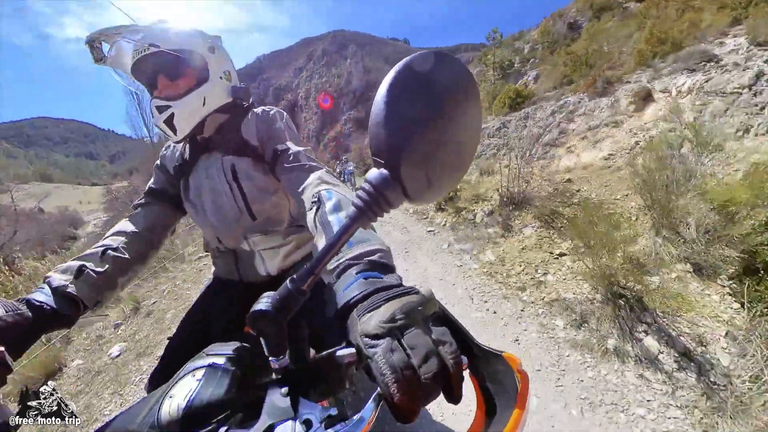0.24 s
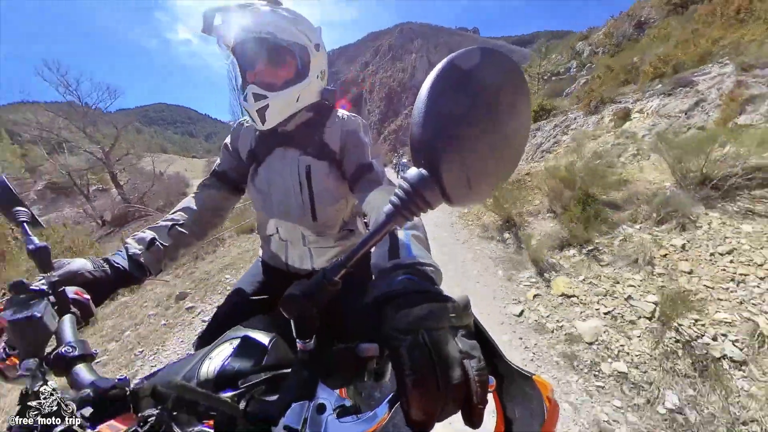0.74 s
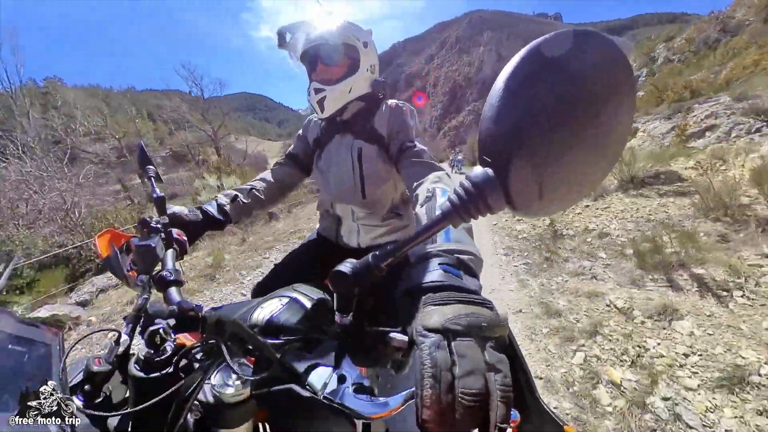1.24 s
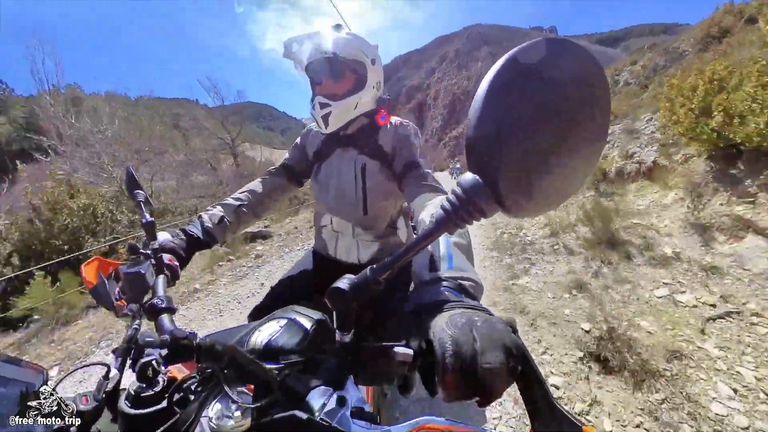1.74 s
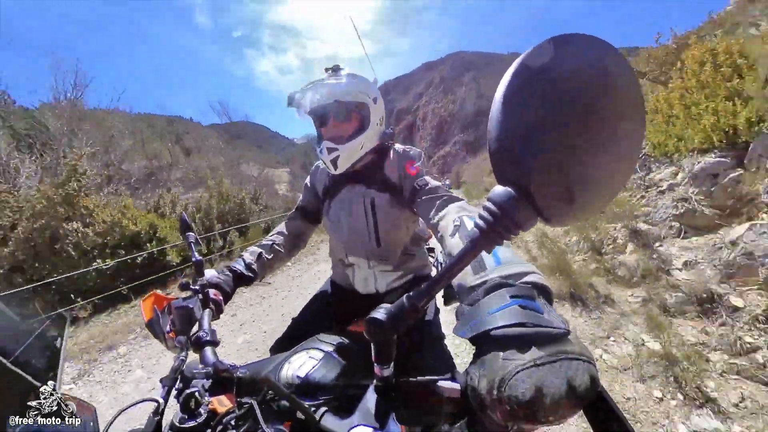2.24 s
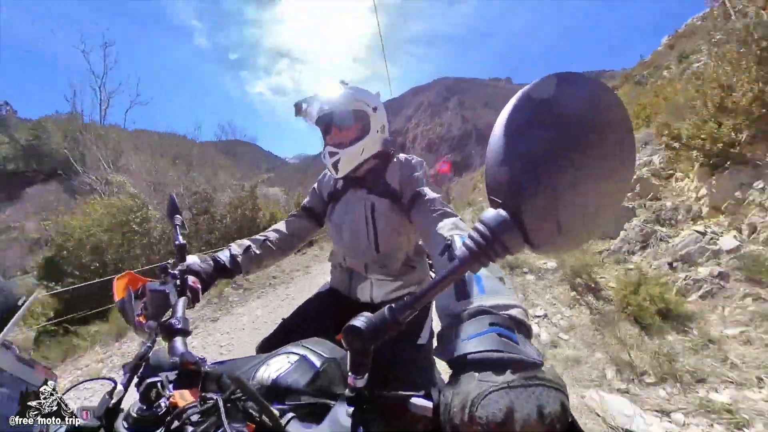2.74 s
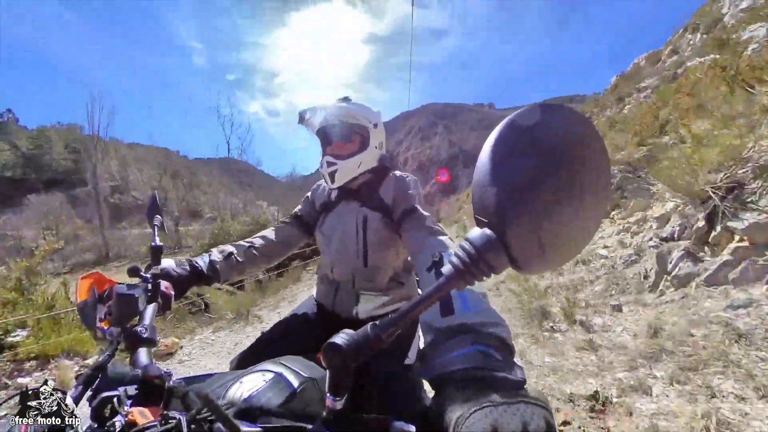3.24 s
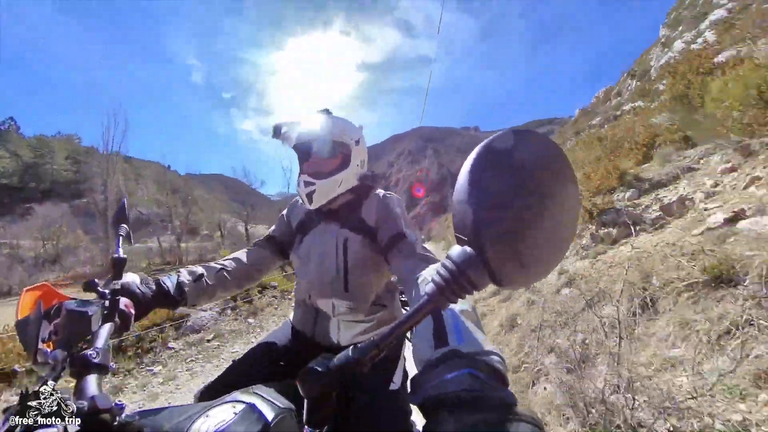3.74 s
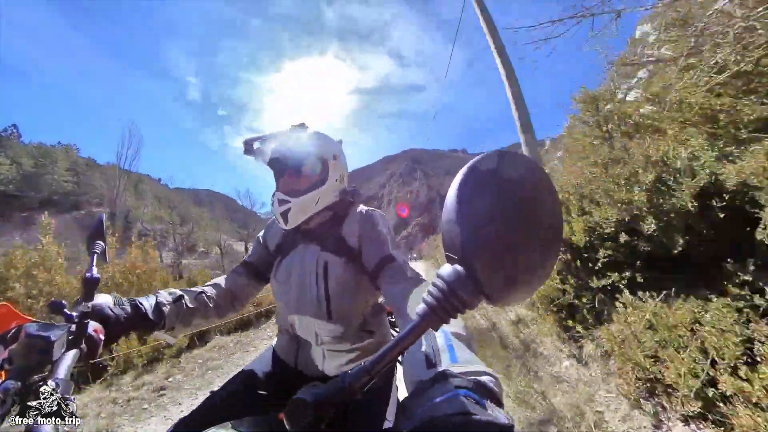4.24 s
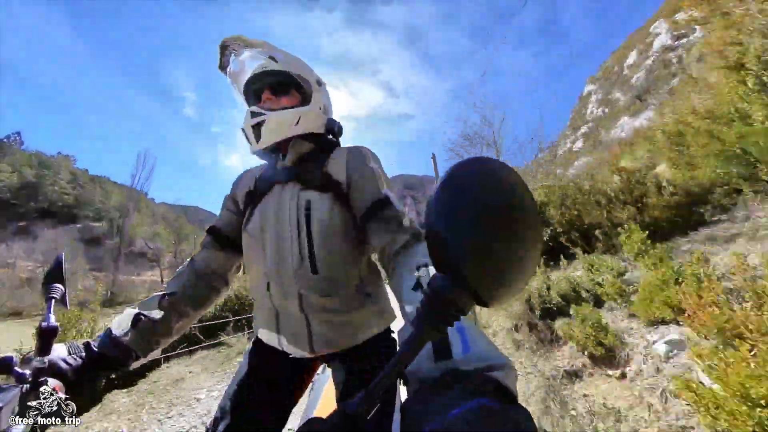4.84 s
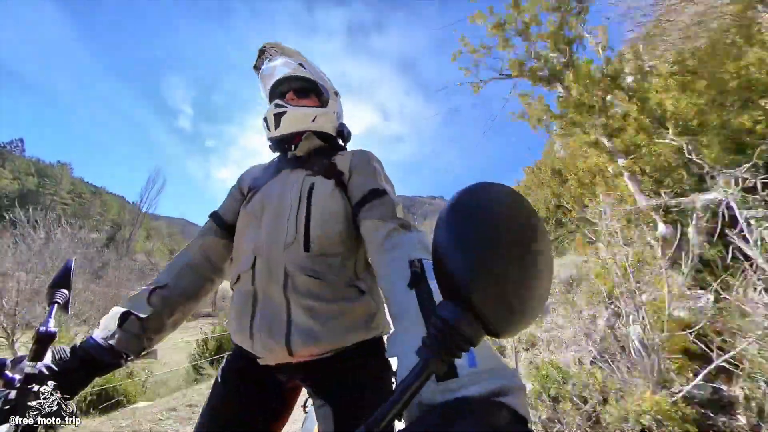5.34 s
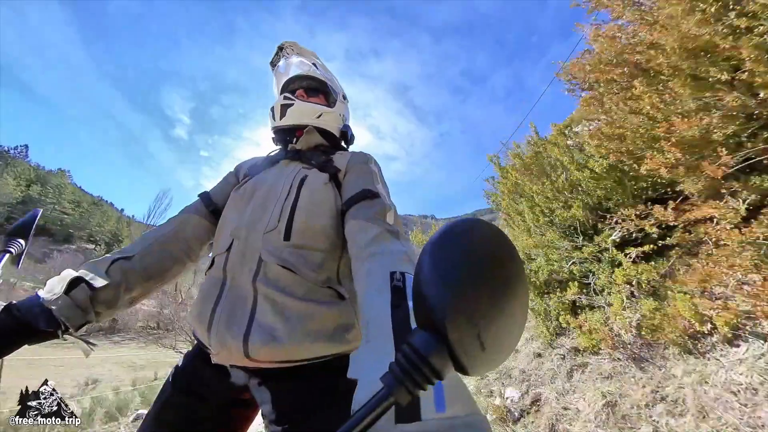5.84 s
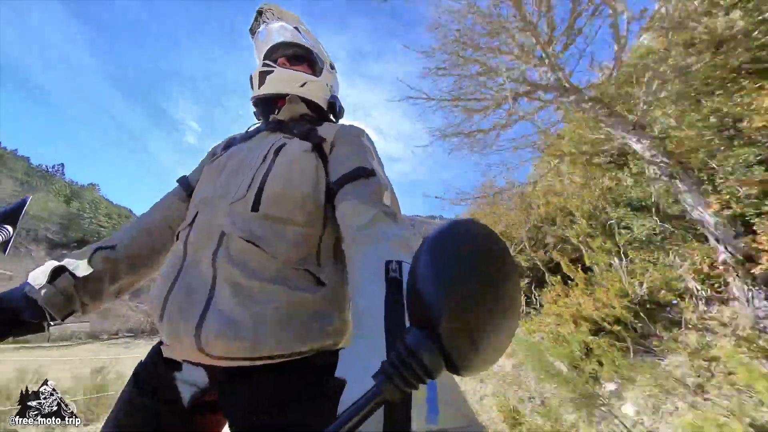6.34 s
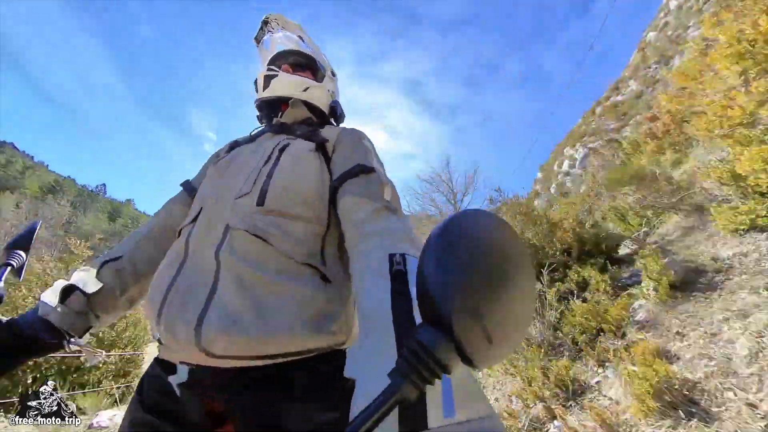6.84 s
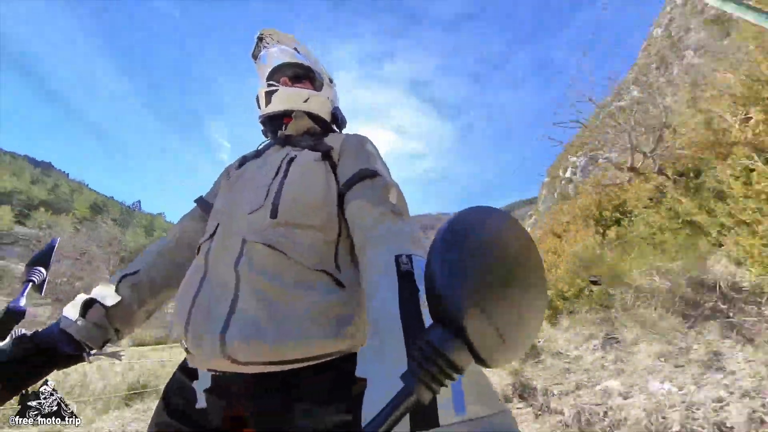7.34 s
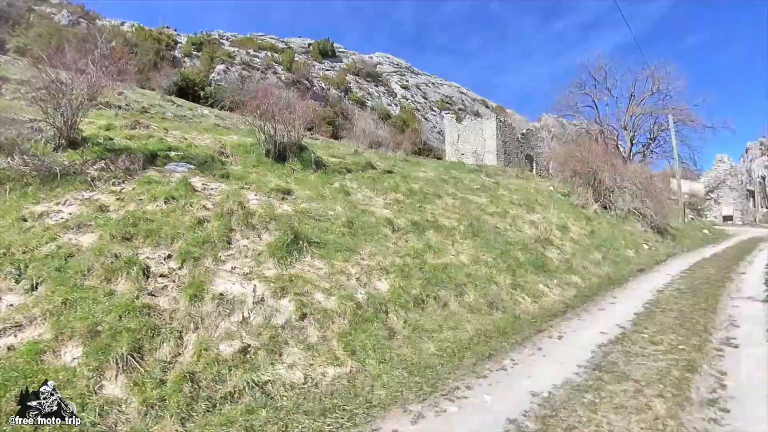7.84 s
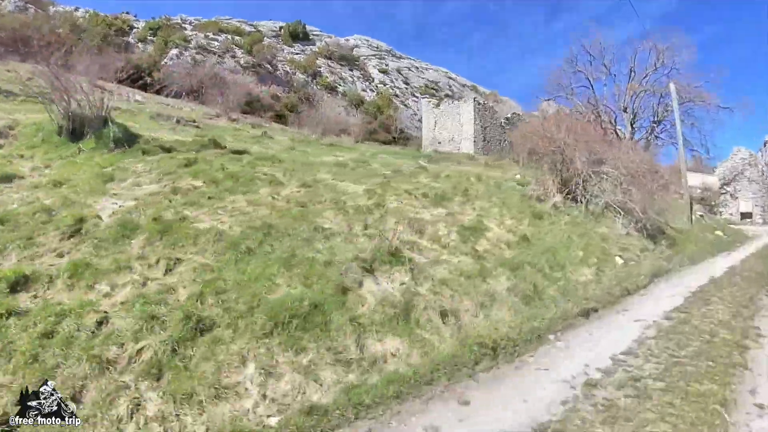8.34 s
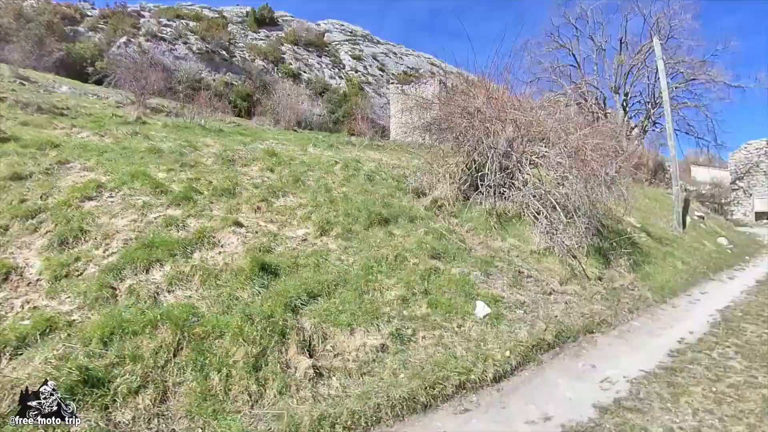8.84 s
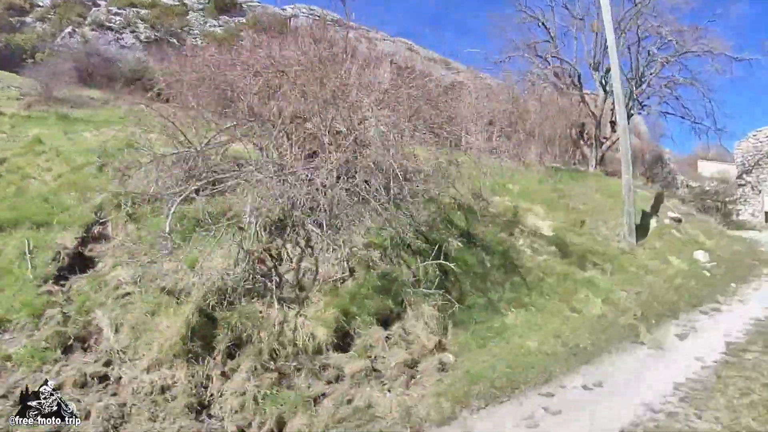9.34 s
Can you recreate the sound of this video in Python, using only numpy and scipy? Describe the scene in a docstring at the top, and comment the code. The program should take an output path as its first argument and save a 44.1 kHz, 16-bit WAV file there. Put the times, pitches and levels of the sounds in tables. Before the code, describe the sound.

A motorcycle engine throbs and drones along a gravel trail, with stones knocking against the frame and light wind scuffing the microphone.

```python
"""A dull, throbbing roar with firing tones in it: a twin-cylinder motorcycle pulls along a gravel trail.
Periodic firing gives the tones and modulates the roar and the buzzing panels; a thin hiss lies on top.
Stones strike the frame and excite its modes, and turbulent wind scuffs the right port of a two-port
microphone on the handlebar. A limiter holds the peaks; near the end the gain jumps up with a tick."""
import sys
import numpy as np
from scipy import signal
from scipy.fft import rfft, irfft
from scipy.io import wavfile
from scipy.ndimage import uniform_filter1d, minimum_filter1d

SR = 44100
rng = np.random.default_rng(int(sys.argv[2]) if len(sys.argv) > 2 else 0)


def persist_wave(psi):
    """Save psi, clipped to +-1, as 16-bit WAV."""
    counts = np.round(np.clip(psi, -1, 1) * 32767).astype(np.int16)
    wavfile.write(sys.argv[1], SR, np.atleast_2d(counts).T)


N = 422478
T, HZ = np.arange(N) / SR, np.fft.rfftfreq(N, 1 / SR)
JUMP_S = 7.863  # the gain steps up here


def amp(db):
    """Amplitude ratio of a level in dB."""
    return 10 ** (np.asarray(db) / 20)


def unit_rms(x):
    """Normalisation to rms 1."""
    return x / np.sqrt(np.mean(x ** 2) + 1e-20)


def over_hz(rows):
    """Interpolation of a table's columns over log frequency."""
    f, *columns = np.transpose(rows)
    return [np.interp(np.log(HZ + 1), np.log(f), c) for c in columns]


def over_time(rows):
    """Interpolation of a table's columns over time."""
    s, *columns = np.transpose(rows)
    return [np.interp(T, s, c) for c in columns]


def drift(rate_hz):
    """Random fluctuation of rms 1: noise low-passed near rate_hz."""
    hz = np.fft.rfftfreq(8192, N / SR / 8192)
    slow = irfft(rfft(rng.standard_normal(8192)) * np.exp(-(hz / rate_hz) ** 2))
    return unit_rms(np.interp(T, np.linspace(0, N / SR, 8192), slow))


def lorentzian(f, hz, width):
    """Resonance curve of height 1, centred on hz."""
    return 1 / (1 + (2 * (f - hz) / width) ** 2)


def resonance(envelope, hz, width):
    """Forced response, at rms 1, of a resonator to modulated noise; hz may glide."""
    force = rng.standard_normal(N) * envelope
    carrier = np.exp(2j * np.pi * np.cumsum(hz * np.ones(N)) / SR)
    pole = np.exp(-np.pi * width / SR)
    baseband = signal.lfilter([1], np.convolve([1, -pole], [1, -pole]), force / carrier)
    return unit_rms((carrier * baseband).real)


def exhaust_throb(turns, second_puff, depth):
    """Amplitude modulation by two decaying puffs a cycle, no two firings alike."""
    puffs = np.exp(-(turns % 1) / 0.15) + second_puff * np.exp(-((turns - 0.47) % 1) / 0.2)
    firing_index = (2 * turns + 0.06).astype(int)
    uneven_db = 2.5 * np.clip(rng.standard_normal(600), -2, 1.5)[firing_index]
    return (1.2 - 0.75 * depth + 1.5 * depth * puffs * amp(uneven_db)) * amp(1.5 * drift(16.3))


def firing_tones(turns, cycle_hz, odd_db):
    """Harmonic series of the engine cycle; pipe resonances lift the orders that cross them."""
    # orders 3 to 14, some favoured by uneven firing: level/dB
    low_orders_db = [-34, -27, -27, -27, -23, -27, -34, -24, -33, -28, -28, -39]
    # exhaust pipe resonances: f/Hz, width/Hz, lift/dB
    pipe_modes = [(248, 40, 5), (128, 22, 7)]
    high_orders_db = [-34.5 if k % 2 else -33.5 for k in range(15, 31)]
    out = 0
    for k, db in enumerate(low_orders_db + high_orders_db, 3):
        pipe_db = sum(lift * lorentzian(k * cycle_hz, hz, width) for hz, width, lift in pipe_modes)
        level_db = db + pipe_db + odd_db * (k % 2) + 2 * drift(5.7)
        out = out + amp(level_db) * np.cos(2 * np.pi * (k * turns + rng.random()))
    return out


def roar(throb, bass_db, low_boom_db, high_boom_db):
    """Band-split noise, two independent signals: bass, then boom and clatter modulated by the firing."""
    bass_band, clatter_band = 1 / (1 + (HZ / 165) ** 6), 1 / (1 + (520 / (HZ + 1)) ** 8)
    boom_band = (1 - bass_band) * (1 - clatter_band)
    split, dull = 1 / (1 + (HZ / 275) ** 10), 1 / (1 + (HZ / 1800) ** 4)
    chug = unit_rms(uniform_filter1d(throb, size=500) * amp(1.5 * drift(14)))  # one lump to a firing
    pair = []
    for a, b, c in rng.standard_normal((2, 3, N)):
        bass = rfft(a * amp(bass_db)) * np.sqrt(bass_band)
        boom = rfft(b * chug * amp(low_boom_db)) * split + rfft(b * chug * amp(high_boom_db)) * (1 - split)
        clatter = rfft(c * throb) * dull + rfft(c * np.sqrt(throb)) * (1 - dull)  # treble throbs less
        pair.append(irfft(bass + boom * np.sqrt(boom_band) + clatter * amp(-2.5) * np.sqrt(clatter_band), N))
    return pair


def ports(common, left_only, tones):
    """Partial coherence: the left port mixes the right's roar, phase-shifted, with its own."""
    # response of the ports: f/Hz, left/dB, right/dB, coherence, left lag/rad
    response = [(30, -35, -27.5, 0.4, 8), (57, -24.5, -27, 0, -1.5), (94.4, -17.5, -6.5, 0.8, 4.5),
                (130, -7.5, -16, 0.6, 0), (142, -7.5, -15.5, 0.1, -0.4), (165, -8.5, -10, 0.5, 4),
                (210, -8.5, -8.5, 0.3, 2.5), (252.3, -2, -3.5, 0.96, 2.5), (326.6, 0, -0.5, 0.96, 2.5),
                (368.3, -10.5, -7.5, 0.54, 2.5), (448.3, -4, -10, 0.74, 2.5), (612, -23, -15.5, 0.15, 6),
                (737, -22.5, -10.5, 0.4, -10.5), (970, -23.5, -20.5, 1, -5), (1552, -32, -24.5, 0.4, -4),
                (2520, -47, -45.5, 0.8, -1), (4240, -52.5, -50.5, 0, -4.5), (6200, -82, -82, 0.15, -28.5)]
    # housing resonances: f/Hz, width/Hz, left lift/dB, right lift/dB
    housing_modes = [(117.6, 22, 1.5, 0), (1505, 180, -3.5, -11), (1910, 140, 6.5, 5.5), (736, 150, -7, -1)]
    # path of the firing tones to the left port: f/Hz, lag/rad, level/dB
    tone_path = [(90, 1.1, 0), (115, 0, -4), (143, 0.2, -4), (155, 2.6, -1), (200, 2.4, 1), (240, 1.9, 0),
                 (265, 1.8, 0), (295, 2.4, -1), (700, 2.5, -1)]
    left_db, right_db, coherence, lag = over_hz(response)
    for hz, width, left_lift_db, right_lift_db in housing_modes:
        left_db += left_lift_db * lorentzian(HZ, hz, width)
        right_db += right_lift_db * lorentzian(HZ, hz, width)
    coherence = np.clip(coherence, 0, 1)
    tone_lag, tone_db = over_hz(tone_path)
    left = coherence * np.exp(-1j * lag) * rfft(common) + np.sqrt(1 - coherence ** 2) * rfft(left_only)
    left += amp(tone_db) * np.exp(-1j * tone_lag) * rfft(tones)
    return irfft([left * amp(left_db), rfft(common + tones) * amp(right_db)], N)


def panel_buzz(throb, load_db):
    """Forced vibration of pipe and panels; their balance shifts with load and at the jump."""
    # modes: f/Hz, width/Hz, left/dB, right/dB, slope/(dB per dB of load), change at jump/dB, left sign
    panel_modes = [(626, 160, -25, -31.5, 5.5, -7.5, -1), (164, 43, -18, -24, -2, 11, 1),
                   (233.5, 64, -15, -12.5, -1, 11, 1), (777, 230, -31, -15.5, 0, 5.5, -1),
                   (970, 740, -27.5, -23, 1, -7, 1), (1080, 276, -27, -12, 3, 17, 1),
                   (1530, 220, -17.5, -30.5, 0.5, 2, -1), (1994, 140, -26.5, -13, 5, 10.5, -1)]
    jumped = np.clip((T - JUMP_S) / 0.0033, 0, 1)
    out = 0
    for hz, width, left_db, right_db, slope, change_db, sign in panel_modes:
        buzz = resonance(throb, hz, width) * amp(slope * load_db + change_db * jumped)
        out += buzz * amp([[left_db], [right_db]]) * [[sign], [1]]
    return out


def hum_and_drone(throb):
    """Narrow-band noise: resonances near 130 and 245 Hz swell and fade."""
    # the two resonances: f/Hz, width/Hz, left/dB, right/dB
    modes = [(132.6, 29, -17.5, -10.5), (246.2, 40, -13, -12)]
    # their swells: t/s, hum level/dB, drone level/dB
    swells = [(0, 3, -4), (.5, 11, -9), (1.25, 8, -6), (1.45, -2, -8), (2.0, -3, -3), (2.8, 0.5, -2),
              (3.4, -1, 5), (3.6, 2.5, -8), (4.1, 0.5, 1), (4.8, -3, -8.5), (5.5, 5.5, 3), (6.3, 4, 3.5),
              (7.0, -4.5, 0), (7.8, -0.5, -3), (8.0, -3, 0.5), (8.5, 1, -5), (9.1, -6.5, -0.5),
              (9.58, -2.5, -6.5)]
    return sum(resonance(throb, hz, width) * amp(swell_db) * amp([[left_db], [right_db]])
               for (hz, width, left_db, right_db), swell_db in zip(modes, over_time(swells)))


def growl(throb, level_db):
    """Forced vibration of tank and fairing, in antiphase at the two ports."""
    # tank and fairing modes: f/Hz, width/Hz, left/dB, right/dB
    modes = [(612.6, 48, -15, 6.5), (407, 56, -0.5, -2.5)]
    return sum(resonance(throb, hz, width) * amp(level_db) * amp([[left_db], [right_db]])
               for hz, width, left_db, right_db in modes) * [[-1], [1]]


def gear_whine(throb, cycle_hz, tones_db):
    """Tooth meshing: a noise band at a fixed multiple of the engine's cycle rate."""
    teeth_per_cycle = 158
    whine = resonance(np.sqrt(throb), teeth_per_cycle * cycle_hz, width=260)
    return whine * amp(-29 + 0.6 * tones_db + 1.5 * drift(6)) * [[-0.6], [1]]


def engine():
    """Periodic excitation: one firing cycle times the tones, the roar and the resonances."""
    # engine speed, which a gear change drops: t/s, cycle rate/Hz
    speed = [(0, 18.4), (.4, 18.3), (.8, 17.75), (1.2, 18.8), (1.5, 20.5), (1.9, 20.5), (2.1, 21.15),
             (2.5, 21.75), (2.7, 22.6), (2.85, 23.0), (3.0, 24.05), (3.2, 23.95), (3.45, 25.0), (3.6, 24.5),
             (3.9, 17.8), (4.05, 17.8), (5.4, 21.55), (5.9, 22.4), (6.4, 22.5), (7.0, 21.45), (7.4, 21.2),
             (8.2, 21.4), (9.58, 20.4)]
    # load and timbre: t/s, load/dB, bass/dB, boom near 240 Hz/dB, boom near 310 Hz/dB, growl/dB
    load = [(0, -0.5, 1, 0.5, 1.5, -11), (.5, -3.5, 1, -5.5, 0, -16), (1.2, -0.5, -3, -5, -1, -10),
            (1.45, -4.5, -3.5, -5.5, 1.5, -19.5), (1.9, -3, -5.5, -1, -2.5, -6),
            (2.5, -2.5, -3, -1, -2.5, -14.5), (3.0, -0.5, 2.5, -5, -4, -15), (3.45, -2, 2, 4.5, -5.5, -24),
            (3.6, -7, -3, 1.5, -1, -18), (4.1, -6.5, 4.5, -0.5, -1, -18.5),
            (4.5, -1.5, -3.5, 7.5, -3, -15.5), (5.0, -8, -2, -3.5, -0.5, -14),
            (5.9, -2, 2.5, 4.5, -0.5, -10.5), (6.3, -4, 4.5, 4, -0.5, -35),
            (7.0, -3, 2.5, 7.5, -1.5, -26.5), (7.85, -3.5, -1.5, 2, 0, -25),
            (8.5, -3.5, -2.5, 2.5, -3, -25), (9.2, -3, 4, 3.5, -2, -33), (9.58, -2, -13, -7.5, 8, -27)]
    # firing: t/s, tone level/dB, odd-order change/dB, second puff re first, depth of throb
    firing = [(0, -5, 0, .5, .9), (.8, -5, 0, .4, 1), (1.5, -3, -1, .4, 1), (1.9, -3, -2, .3, 1),
              (2.1, 1, -3, .3, 1), (2.5, 1, -2, .9, 1), (3.0, 2, 0, .9, 1), (3.4, 1, 0, .9, .9),
              (3.53, -9, 0, .6, .5), (4.0, -7, -2, .5, .6), (5.0, -5, -2, .7, .6), (5.5, -3, -1, .95, .9),
              (6.1, -3, -2, .95, .9), (6.5, -6, -3, .6, .7), (7.2, -5, -3, .5, .9), (7.8, -4, -4, .7, .7),
              (7.9, -1, -9, .9, .5), (9.0, -1, -9, .9, .5), (9.58, -4, -9, .9, .5)]
    cycle_hz, = over_time(speed)
    load_db, bass_db, low_boom_db, high_boom_db, growl_db = over_time(load)
    tones_db, odd_db, second_puff, depth = over_time(firing)
    turns = np.cumsum(cycle_hz * (1 + 0.0027 * drift(4.2))) / SR  # phase in engine cycles
    throb = exhaust_throb(turns, second_puff, depth)
    tones = amp(tones_db) * firing_tones(turns, cycle_hz, odd_db)
    common, left_only = roar(throb, bass_db, low_boom_db, high_boom_db)
    out = unit_rms(ports(common, left_only, tones)) * amp(9)
    out += panel_buzz(throb, load_db) + hum_and_drone(throb) + growl(throb, growl_db)
    return (out + gear_whine(throb, cycle_hz, tones_db)) * amp(-25)


def hiss():
    """Partly coherent treble noise; its low and high bands flicker independently."""
    # hiss spectrum: f/Hz, level/dB
    spectrum = [(4500, -23.5), (5500, -16.5), (7000, -16), (10200, -19), (11500, -6), (13200, 0),
                (14500, -7), (15700, -4.5)]
    # likeness of left and right: f/Hz, coherence
    likeness = [(5000, 0.34), (6500, 1), (10800, 1), (12900, .25), (15000, .55)]
    # hiss envelope: t/s, level/dB
    envelope = [(0, -58), (2.9, -56.5), (3.5, -59.5), (5.0, -58.5), (5.4, -56.5), (6.2, -57), (7.8, -58.5),
                (7.9, -60), (8.14, -54), (8.4, -58.5), (9.58, -58.5)]
    coherence = np.clip(over_hz(likeness)[0], 0, 1)
    noise = rng.standard_normal((2, N))
    low, high = (rfft(noise * amp(2.3 * drift(20) + drift(90))) for _ in range(2))
    right, left_only = np.where(HZ > 10300, high, low)
    left = coherence * right + np.sqrt(1 - coherence ** 2) * left_only
    pair = irfft(np.array([left, right]) * amp(over_hz(spectrum)[0]), N)
    return unit_rms(pair) * amp(over_time(envelope)[0] + [[1], [-1]])  # leans left


def stones():
    """Impact excitation: each stone rings the frame's damped modes, most those near its own pitch."""
    # stone strikes: t/s, peak level at the right port before limiting/dB, f/Hz
    strikes = [(0.053, -0.5, 624), (0.111, -8, 600), (0.408, -2.5, 630), (0.582, -9, 630), (0.632, -1, 710),
               (0.802, -18, 700), (0.967, -1, 633), (1.13, -4.5, 616), (1.183, -10, 600), (1.334, -4, 649),
               (1.726, -5, 1220), (1.861, -3, 923), (2.067, -3, 620), (2.35, -5.5, 614), (2.486, -6, 600),
               (2.623, -6, 600), (2.886, -5, 560), (3.841, -5, 1080), (4.091, -5, 800), (4.125, -3, 624),
               (4.363, -2.5, 1200), (4.389, -1, 910), (4.444, 1, 706), (4.908, -5, 635), (5.057, -8, 750),
               (5.101, -3, 600), (5.429, -7, 681), (5.841, 0, 890), (5.931, -7, 620), (7.056, -4, 700),
               (7.102, 0, 905), (7.17, -10, 950), (7.195, -4.5, 910), (7.242, -3, 614), (7.336, -7, 1200),
               (7.344, -0.5, 1000), (7.477, -4, 600), (7.568, -3, 675), (7.893, -2, 773), (8.149, 1, 1140),
               (8.409, -15, 1090), (8.47, -1, 1060), (8.647, -9, 845), (8.934, -3, 1090), (9.07, -2, 1050),
               (9.241, -2, 1060), (9.272, -7, 673), (9.394, -9, 1060), (9.417, -11, 600)]
    # frame modes: f/Hz, level/dB, T60/s
    frame_modes = [(456, -0.5, 0.0045), (598, 7, 0.027), (775, 1, 0.0097), (927, 9.5, 0.015),
                   (1101, 4.5, 0.03), (1280, 2, 0.023), (1530, -10.5, 0.011)]
    grit_per_s, attack_s = 9, 0.00096
    when, size, pitch = rng.random((int(grit_per_s * N / SR), 3)).T
    grit = zip(when * N / SR, -20 - 6.8 * np.log(0.08 + size), 550 * 2.3 ** pitch)
    out, t = np.zeros(N + 2000), np.arange(2000) / SR
    attack = 1 - np.exp(-(t / attack_s) ** 2)
    for s, db, hz in strikes + list(grit):
        ring = sum(amp(mode_db - 12 * abs(np.log2(f / hz)) - 60 * t / t60) * np.sin(2 * np.pi * f * t)
                   for f, mode_db, t60 in frame_modes)
        out[round(s * SR):][:2000] += amp(db) * ring / abs(ring).max() * attack
    return out[:N] * amp([[-12], [0]])


def wind():
    """Turbulence, mostly at the right port: gusts rise, hold and fall, brighter the stronger."""
    # gusts: t/s, duration/s, level/dB
    gusts = [(1.398, 0.012, -33), (1.837, 0.055, -37), (3.37, 0.0065, -31.5), (3.646, 0.045, -28.5),
             (3.697, 0.0077, -28), (3.716, 0.023, -28), (4.046, 0.02, -29.5), (4.274, .005, -31),
             (4.737, 0.0049, -32), (4.816, 0.087, -33), (5.002, 0.0044, -34), (5.077, 0.088, -34),
             (5.092, 0.63, -35), (5.276, 0.011, -33), (5.496, 0.031, -33.5), (5.674, .01, -33),
             (6.007, 0.025, -30.5), (7.757, .01, -34), (7.924, 0.13, -33.5), (8.032, 0.025, -31.5),
             (8.075, 0.023, -27.5), (8.122, 0.011, -28.5), (8.146, 0.037, -27.5), (8.19, 0.12, -32.5),
             (8.482, 0.021, -35), (9.298, 0.057, -34.5), (9.436, 0.063, -32), (9.508, 0.095, -28.5)]
    # turbulence spectrum: f/Hz, level/dB
    spectrum = [(300, -11), (900, 10.5), (1800, 5), (3000, -8), (3800, -15), (4600, -26), (5500, -36),
                (8000, -46.5), (10500, -42.5), (13000, -39.5), (15500, -41.5)]
    calm_db, strong_db, rise_db_per_s, bright_hz = -47.5, -34, 446.5, 2650
    power = amp(calm_db) ** 2
    for s, length, db in gusts:
        fall_db_per_s = 555.5 + 250 * max(db - strong_db, 0)  # strong gusts break off faster
        before, after = np.maximum(s - T, 0), np.maximum(T - s - length, 0)
        power = power + amp(db - rise_db_per_s * before - fall_db_per_s * after) ** 2
    lumps = np.sqrt(power) * amp(2 * drift(150))
    brightness = amp(0.87 * np.maximum(10 * np.log10(power) - strong_db, 0)) - 1
    colour = amp(over_hz(spectrum)[0])
    noise = np.array([unit_rms(irfft(rfft(x) * colour, N)) for x in rng.standard_normal((2, N))])
    treble = irfft(rfft(noise) / (1 + (bright_hz / (HZ + 1)) ** 6), N)
    return (noise + brightness * treble) * lumps * amp([[-14], [0]])


def ticks():
    """Steps with exponential decay, weaker and inverted at the left port; the loudest comes with the gain jump."""
    # dry ticks, the loudest where the gain jumps: t/s, level/dB
    steps = [(3.734, -25), (4.049, -27), (6.028, -40), (7.8633, -10), (8.08, -31), (8.265, -36)]
    pressure = sum(amp(db) * (T > s) * np.exp(-np.maximum(T - s, 0) / 0.0015) for s, db in steps)
    return pressure * [[-0.32], [1]]


def scene():
    """Superposition of the sources at the two ports."""
    return engine() + hiss() + stones() + wind()


def record(dry):
    """Peak limiting, then a step in gain, added ticks and a low-pass band limit."""
    threshold_db, jump_db, cutoff_hz = -9, 4, 15770
    headroom_db = threshold_db - 20 * np.log10(abs(dry).max(0) + 1e-9)
    duck_db = uniform_filter1d(minimum_filter1d(np.minimum(headroom_db, 0), size=300), size=260)
    jumped = np.clip((T - JUMP_S) / 0.0025, 0, 1)
    limited = dry * amp(0.89 * duck_db + jump_db * jumped)
    low_pass = signal.firwin(1023, cutoff_hz, window=("kaiser", 8), fs=SR)
    return signal.oaconvolve(limited + ticks(), low_pass[None], "same")


dry = scene()
out = record(dry)
persist_wave(out)
```